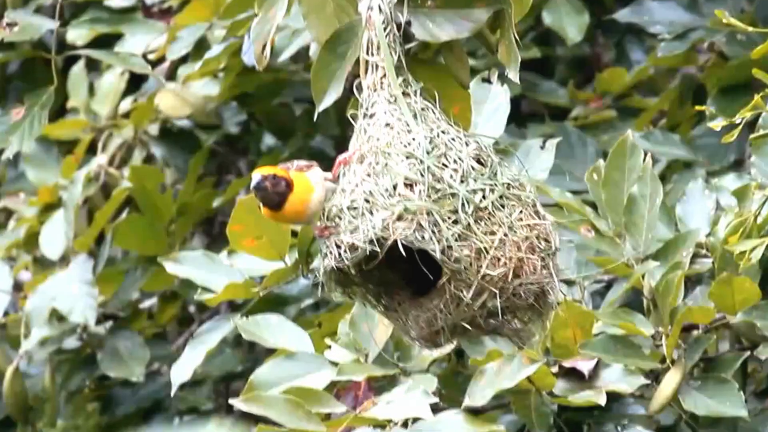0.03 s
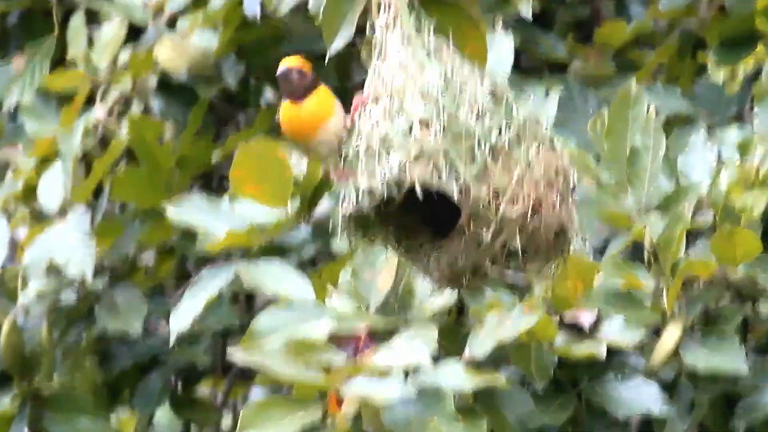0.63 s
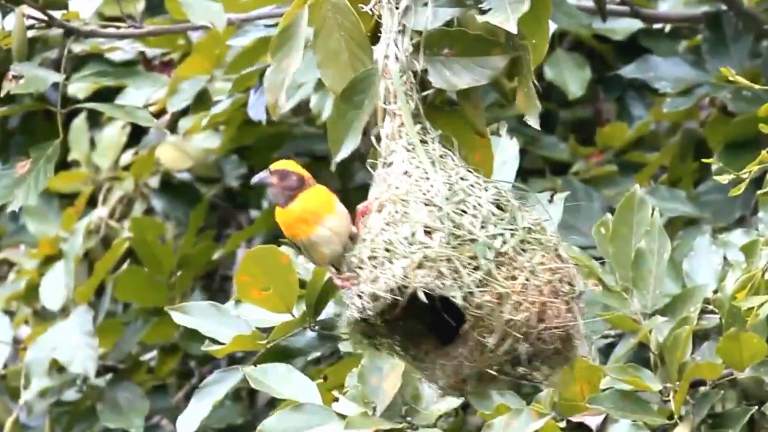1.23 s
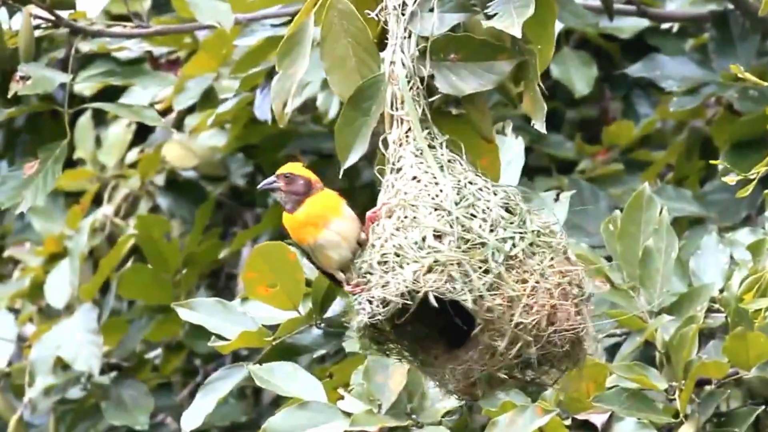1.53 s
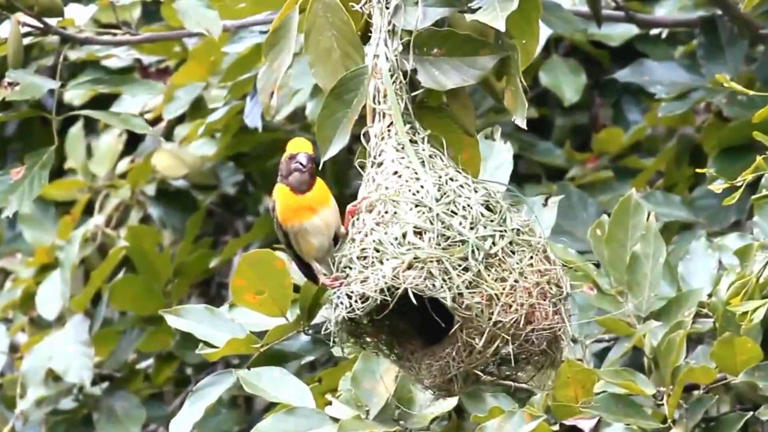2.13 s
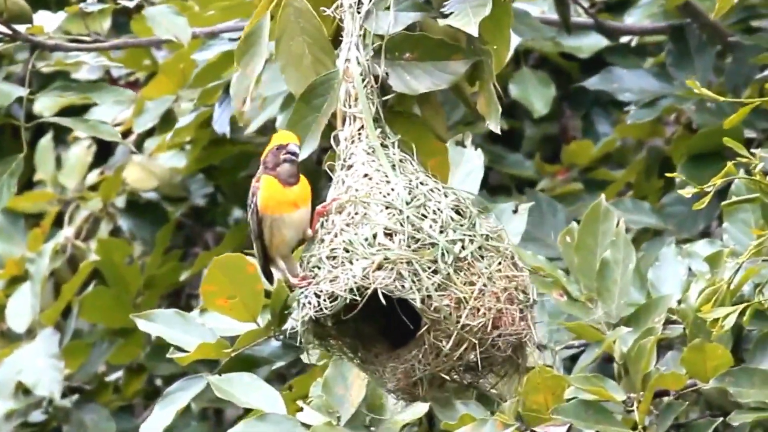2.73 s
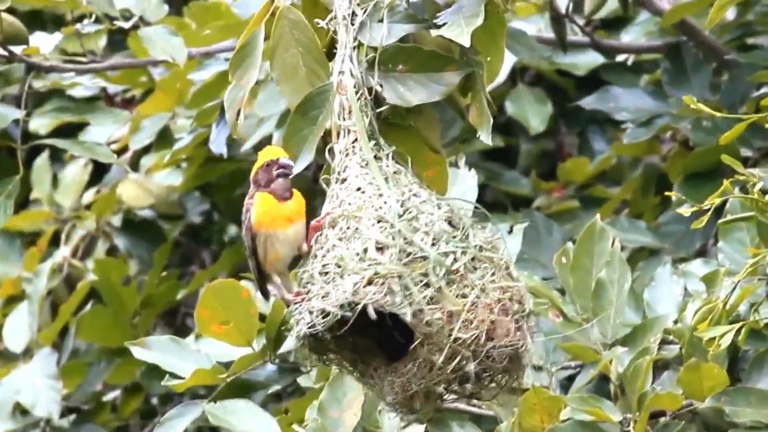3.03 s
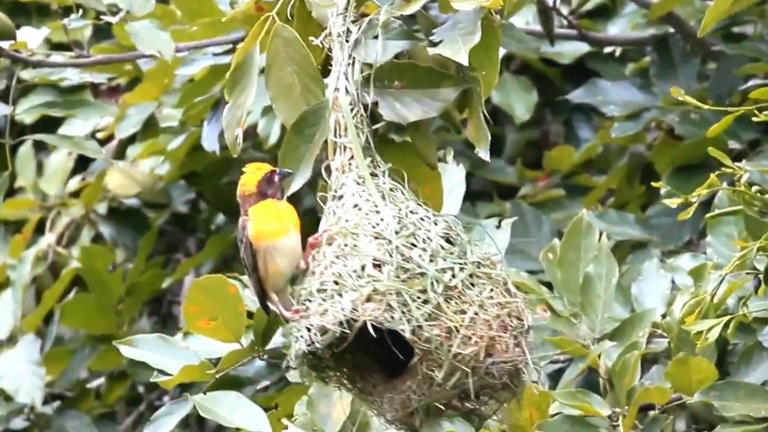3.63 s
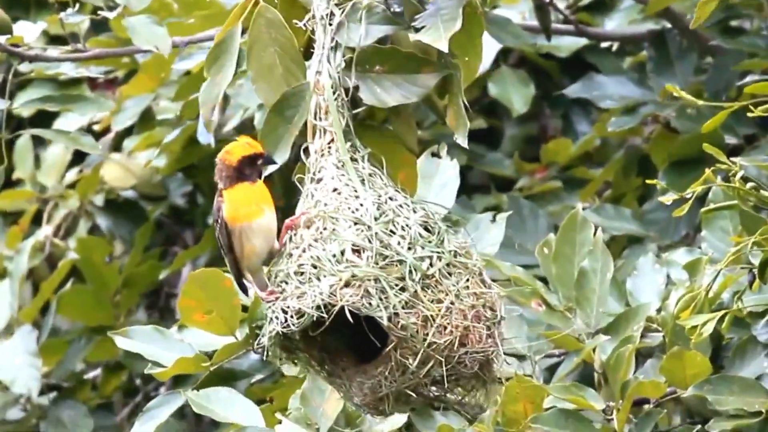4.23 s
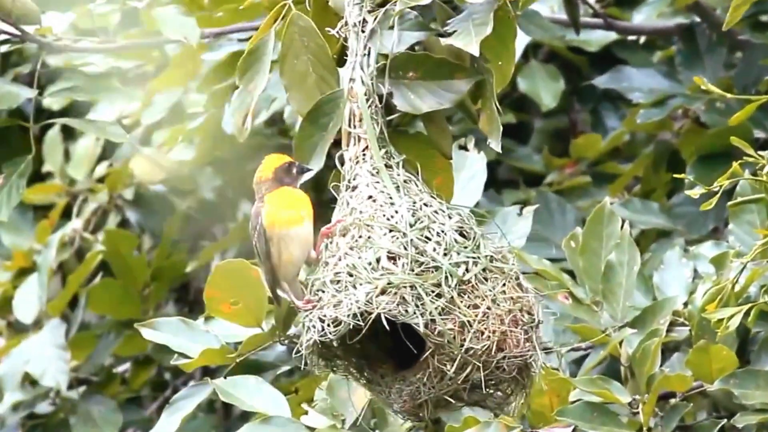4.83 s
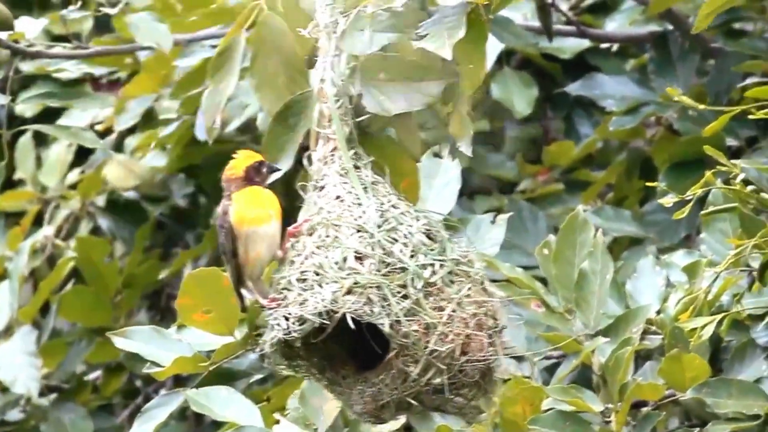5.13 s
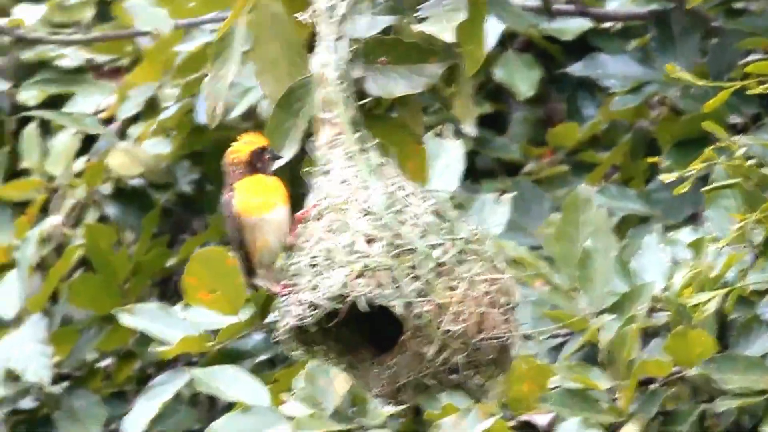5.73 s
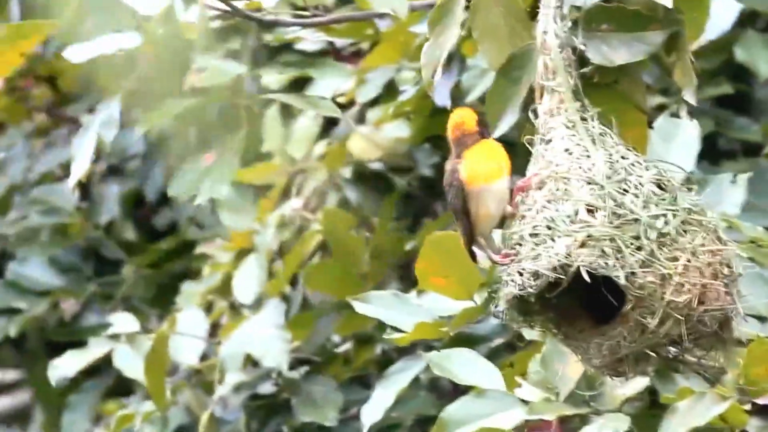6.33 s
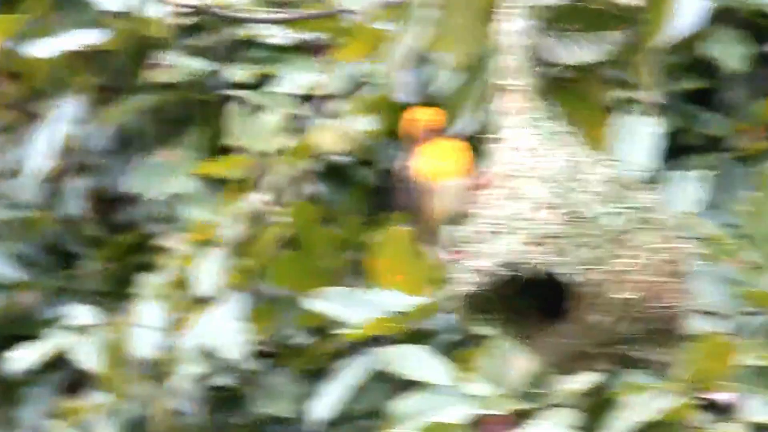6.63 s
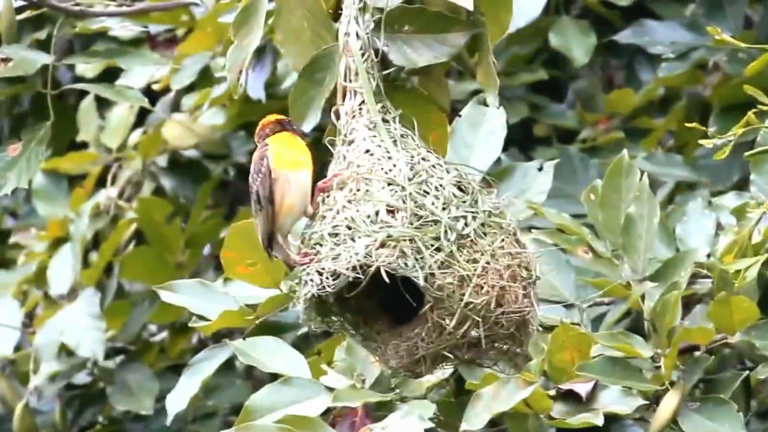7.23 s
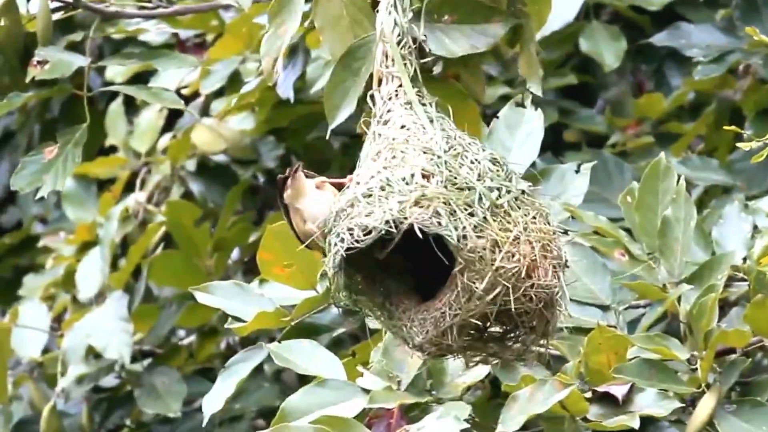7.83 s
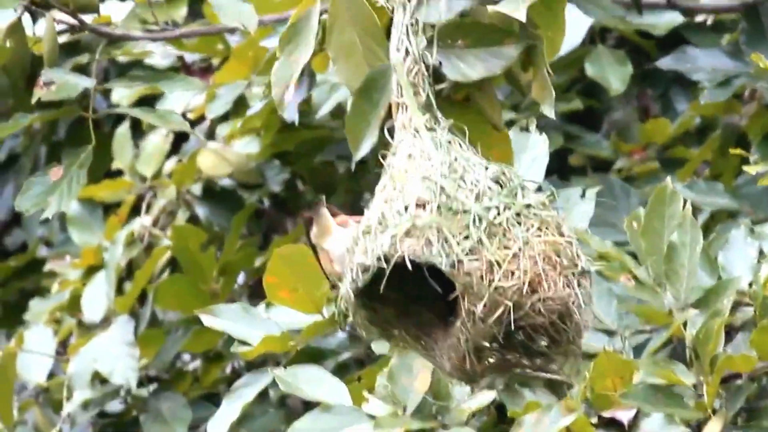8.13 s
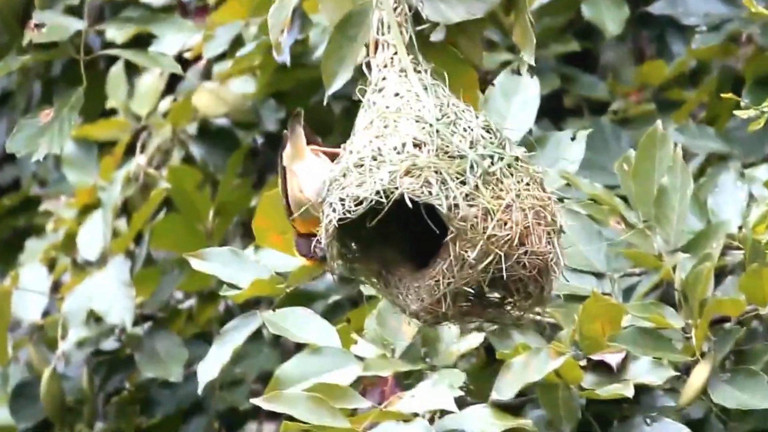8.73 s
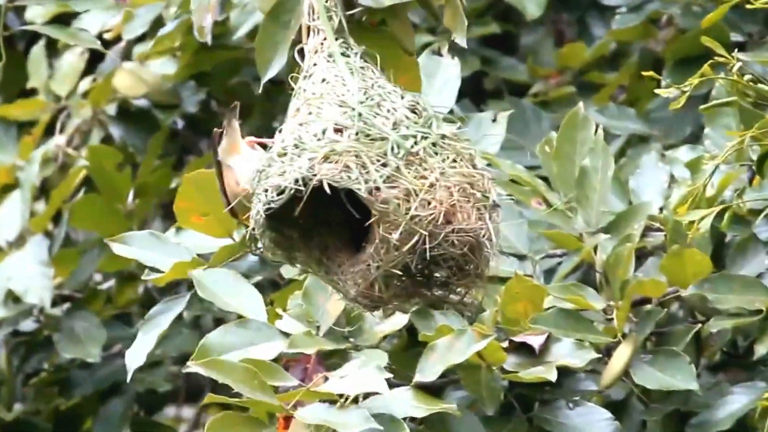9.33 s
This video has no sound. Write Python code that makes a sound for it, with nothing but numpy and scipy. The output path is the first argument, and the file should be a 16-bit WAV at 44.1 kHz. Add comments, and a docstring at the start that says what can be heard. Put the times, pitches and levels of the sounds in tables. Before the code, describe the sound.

A steady high insect band, faint leaf rustle and a low distant hum run throughout, outdoors among trees. A close songbird gives one bright phrase at the start. Another bird repeats a two-note whistle about three times a second until 6.5 seconds, returning at 8. During the first two seconds soft low coos sound far off while a weaver bird chatters in short scratchy bursts. The weaver whistles at 2 seconds, then gives a wheezy buzz from 2.6 to 3.5. The close songbird, the loudest voice, sings five quick high phrases from 3.5 to 5, and crickets grow clearer. At 5 seconds a crow caws once in the distance, and a far songbird repeats falling phrases until 8.5. Brief chatter and five more close phrases come between 7.4 and 8.8. The foliage scatters the calls into short echoes.

```python
"""A leafy tree, with faint rustle, a distant hum, crickets and a steady insect band throughout.
First a two-note bird starts up and low calls sound far off, while a weaver at its nest chatters.
The weaver whistles, then gives a long wheezy buzz, both sides of its syrinx pulsing into one throat.
A near songbird follows in almost pure tones; at five seconds a crow caws and a far songbird joins.
Late on, the chatter and the near song return. The foliage scatters the calls into short echoes."""
import sys
import numpy as np
from scipy import signal
from scipy.fft import rfft, irfft
from scipy.io import wavfile
from scipy.ndimage import uniform_filter1d, map_coordinates

SR = 44100
rng = np.random.default_rng(int(sys.argv[2]) if len(sys.argv) > 2 else 0)


def output_pcm(signal):
    """Save a mono or channel-first signal as 16-bit PCM at the path in sys.argv[1].

    Samples are clipped to [-1, 1] before scaling.
    """
    pcm = np.clip(np.atleast_2d(signal).T, -1, 1) * 32767
    wavfile.write(sys.argv[1], SR, np.round(pcm).astype(np.int16))


N = 413658
T = np.arange(N) / SR


def amp(db):
    """Amplitude ratio: a factor of ten for every 20 dB."""
    return 10 ** (np.asarray(db) / 20)


def unit(x):
    """Normalisation to an rms of 1."""
    return x / np.sqrt(np.mean(x ** 2) + 1e-20)


def response(spectrum, hz):
    """Frequency response: the gain at hz, interpolated in dB over log frequency."""
    f, db = np.transpose(spectrum)
    return amp(np.interp(np.log(hz + 1), np.log(f), db))


def noise(spectrum, n):
    """Spectral shaping: white noise is filtered, then normalised."""
    gain = response(spectrum, np.fft.rfftfreq(n, 1 / SR))
    return unit(irfft(rfft(rng.standard_normal(n)) * gain, n))


def drift(n, hz):
    """Random modulation: a smooth curve of rms near 1, with rates up to about hz."""
    knots = rng.standard_normal(2048)
    return map_coordinates(knots, [np.arange(n) * 2 * hz / SR], order=2, mode="wrap")


def phase(hz):
    """Phase as the time integral of frequency."""
    return 2 * np.pi * np.cumsum(hz) / SR


def trace(rows):
    """Linear interpolation of breakpoints: sample times, then a curve for each further column."""
    s, *columns = np.transpose(rows)
    t = np.arange(s.min(), s.max(), 1 / SR)
    return [t] + [np.interp(t, np.sort(s), c) for c in columns]


def add(mix, s, sound):
    """Superposition: the sound joins the mix at s seconds."""
    part = mix[max(round(s * SR), 0):][:len(sound)]
    part += sound[:len(part)]


def syrinx(hz, db, second_db, third_db, waver=0.0048, flutter_db=2.0):
    """Self-sustained oscillation: a tone and two overtones, unsteady in pitch and level."""
    n = len(hz)
    turn = phase(uniform_filter1d(hz, size=50) * (1 + waver * drift(n, 130.1)))
    tone = np.sin(turn) + amp(second_db) * np.sin(2 * turn)
    tone += amp(third_db) * np.sin(3 * turn) * (hz < SR / 6)  # only where it cannot alias
    gain = amp(db + flutter_db * drift(n, 90.1))
    return np.sqrt(2) * tone * gain * signal.windows.tukey(n, min(1, 130 / n))


def note(s, contour, db, overtones_db=-42, pitch=1):
    """Frequency and amplitude modulation along a contour, as (start, sound)."""
    t, hz, level_db = trace(contour)
    return s + t[0], syrinx(hz * pitch, db + level_db, overtones_db, overtones_db)


def bowed_line(u, first_hz, last_hz, bow_hz):
    """A linear sweep over u from 0 to 1, bent by a parabola of height bow_hz."""
    return first_hz + (last_hz - first_hz) * u + bow_hz * (1 - (2 * u - 1) ** 2)


def glide(s, length, first_hz, last_hz, bow_hz, db, swell_db, overtones_db=-42):
    """A frequency sweep whose level changes by swell_db, as (start, sound)."""
    u = np.linspace(0, 1, round(length * SR))
    hz = bowed_line(u, first_hz, last_hz, bow_hz)
    tone = syrinx(hz, db + swell_db * (u - .5), overtones_db, overtones_db)
    return s, tone * signal.windows.tukey(len(u), .46)


def add_phrase(mix, start_s, syllables, db):
    """Superposition of glides with a common time origin and gain."""
    for row in syllables:
        s, sound = glide(*row)
        add(mix, start_s + s, amp(db) * sound)


def harmonics(hz, throat, stop):
    """Source and filter: harmonics from the third up, in random phase, weighted by the throat."""
    turn = phase(hz)
    partials = (throat(k * hz) * np.cos(k * turn + rng.uniform(0, 2 * np.pi)) for k in range(3, stop))
    return unit(sum(partials))


def foliage(x, t60, delay_s=0.0045, echoes_per_s=3000):
    """Scattering by leaves and branches: random echoes that decay 60 dB in t60 seconds."""
    t = np.arange(SR // 2) / SR
    taps = rng.standard_normal(len(t)) * (rng.random(len(t)) < echoes_per_s / SR)
    taps *= (t > delay_s) * amp(-60 * t / t60)
    return signal.oaconvolve(x, taps / np.linalg.norm(taps))[:N]


# The spectrum of outdoor air. Each row: frequency in Hz, relative level in dB.
AIR_SPECTRUM = [(20, -10), (45, -2), (90, -1.5), (140, -2), (200, -6.5), (450, -9), (750, -9),
                (1000, -13.5), (1400, -11.5), (2000, -17), (3000, -15.5), (5000, -15.5), (7500, -28.5),
                (10000, -33.5), (15500, -35)]

def air(db=-51):
    """Broadband ambient noise, strongest in the bass and slightly unsteady."""
    return noise(AIR_SPECTRUM, N) * amp(db + .5 * drift(N, 5.5))


# The course of the distant hum. Each row: time in seconds, pitch in Hz, level in dB.
HUM_CONTOUR = [(0, 72.73, -55.5), (1.5, 71.8, -58.5), (2.6, 71.9, -54), (3.3, 69.96, -53),
               (3.8, 70.15, -49.5), (4.4, 71.1, -47.5), (4.8, 71.8, -50.5), (5.1, 75.13, -52),
               (6.2, 75.5, -54.5), (7.2, 74.8, -58.5), (7.8, 72.8, -55.5), (9.38, 72.35, -57)]

def hum():
    """A low fundamental and its octave waver under random modulation."""
    s, hz, db = np.transpose(HUM_CONTOUR)
    turn = phase(np.interp(T, s, hz) * (1 + 0.0346 * drift(N, 9)))
    gain = amp(np.interp(T, s, db) + 2.3 * drift(N, 7))
    return np.sqrt(2) * gain * (np.sin(turn) + amp(-16) * np.sin(2 * turn))


# Far rumbles. Each row: start and length in seconds, centre and width in Hz, level in dB.
RUMBLE_SWELLS = [(4.3, 3.1, 134, 24, -60), (7.1, 1.33, 145.8, 19.5, -56), (8.1, 1.57, 144, 17, -57),
                 (8.15, 0.75, 350, 47, -56)]

def rumbles():
    """Narrow bands of low noise swell and fade."""
    out = np.zeros(N)
    for s, length, hz, width, db in RUMBLE_SWELLS:
        n = round(length * SR)
        band = [(20, -50), (hz - 2 * width, -16), (hz, 0), (hz + 2 * width, -16), (hz * 4, -70)]
        add(out, s, amp(db) * noise(band, n) * signal.windows.tukey(n, .7))
    return out


def leaf_rustle(db=-67, ticks_per_s=14):
    """Shot noise: each random tick of a leaf or dry grass is a quickly damped burst."""
    ticks = (rng.random(N) < ticks_per_s / SR) * rng.exponential(1, N)
    leaf = noise([(500, -4), (2000, 5.5), (6000, -9.5), (15000, -22)], 600)
    leaf *= np.exp(-np.arange(600) / 120)
    return amp(db) * unit(signal.oaconvolve(ticks, leaf)[:N])


# The spectrum of the insect chorus. Each row: frequency in Hz, relative level in dB.
INSECT_SPECTRUM = [(4000, -32), (5350, -24), (5650, -5), (5820, -6), (5890, 2.5), (5950, -10), (6100, -3.5),
                   (6300, -15.5), (6650, -8), (6850, -13), (7000, -12.5), (7150, -26), (7700, -31)]

def insect_band(db=-48, throb_hz=70, throb_db=1.5):
    """Incoherent summation: many insects merge into a throbbing band of noise."""
    band = noise(INSECT_SPECTRUM, N)
    return amp(db) * unit(band * amp(throb_db * drift(N, throb_hz) + 0.81 * drift(N, 3.2)))


def insect_drone(hz=5900, db=-54, waver=0.00512, throb_hz=60, throb_db=3):
    """Random modulation broadens one tone into the ringing core of the insect band."""
    tone = np.sin(phase(hz * (1 + waver * drift(N, 110))))
    return amp(db) * unit(tone * amp(throb_db * drift(N, throb_hz)))


# The cricket's changing strength. Each row: time in seconds, level in dB.
CRICKET_LEVELS = [(0, -59), (3.4, -71), (4, -49.5), (5.6, -45), (6.1, -53), (6.9, -48), (8.6, -50.5),
                  (9.38, -51)]

def cricket(chirp_gap_s=.16, pulse_gap_s=.021):
    """Stridulation: each chirp is four tone pulses that sag in pitch."""
    out = np.zeros(N)
    pulse = [(0, 6700, -10), (.005, 6610, 1), (.015, 6530, 1), (.022, 6440, -10)]  # s, Hz, dB
    for s in np.arange(.08, T[-1], chirp_gap_s):
        db = np.interp(s, *np.transpose(CRICKET_LEVELS))
        for k, (late, loud, sharp) in enumerate(rng.standard_normal((4, 3))):
            start_s = s + k * pulse_gap_s + .002 * late
            add(out, *note(start_s, pulse, db + 1.5 * loud, overtones_db=-25, pitch=1 + .006 * sharp))
    return out


# Far low calls. Each row: start and length in seconds, first pitch, last pitch and bow in Hz,
# source level in dB.
LOW_CALLS = [(.02, .47, 745, 645, 0, -53), (.6, .38, 675, 570, 10, -59), (1.52, .44, 640, 610, 62, -53)]

def low_calls(direct=0.58, scattered=0.48):
    """Multipath propagation: soft coos arrive partly direct, partly scattered by the trees."""
    out = np.zeros(N)
    for s, length, first_hz, last_hz, bow_hz, db in LOW_CALLS:
        u = np.linspace(0, 1, round(length * SR))
        coo = syrinx(bowed_line(u, first_hz, last_hz, bow_hz), db, -18, -25, waver=.04)
        add(out, s, coo * signal.windows.tukey(len(u), .4))
    return direct * out + scattered * foliage(out, t60=0.3)


# Tiny high trills. Each row: start in seconds, level in dB.
HIGH_TRILLS = [(4.35, -64), (4.95, -62), (5.5, -65), (6.0, -61), (6.74, -59)]

def high_trills(centre_hz=7750, depth_hz=200, rate_hz=95):
    """Sinusoidal frequency modulation turns a brief tone into a trill."""
    out, t = np.zeros(N), np.arange(0, .08, 1 / SR)
    hz = centre_hz + depth_hz * np.sin(2 * np.pi * rate_hz * t)
    for s, db in HIGH_TRILLS:
        add(out, s, syrinx(hz, db, -55, -60))
    return out


# The far songbird's phrases. Each row: time in seconds, level in dB.
FAR_PHRASES = [(5.023, -45), (5.353, -42), (5.684, -40.5), (6.011, -43), (6.34, -44), (6.671, -41),
               (7.013, -42.5), (7.349, -44), (7.695, -42), (8.04, -43), (8.388, -40.5)]
# Its syllables: thin lead, high slip, sweep, hold, fall. Each row: offset and length in seconds,
# first pitch, last pitch and bow in Hz, relative level and swell in dB.
FAR_SYLLABLES = [(-.1, 0.043, 4730, 4450, 30, -4, 11), (-.055, .034, 6510, 6200, 28, -5, 7),
                 (-.015, .031, 6520, 3760, -48, 1, 5), (0.014, .04, 4030, 3880, 37, 1, 17),
                 (0.058, .035, 4520, 3150, 0, 0.5, -1)]

def far_songbird():
    """Five downward frequency sweeps form a phrase, repeated three times a second."""
    out = np.zeros(N)
    for s, db in FAR_PHRASES:
        add_phrase(out, s, FAR_SYLLABLES, db)
    return out


# The crow's caw. Each row: time in seconds, pitch in Hz, level in dB, throat resonance in Hz.
CAW_CONTOUR = [(4.97, 198, -62, 1340), (5.03, 214, -47, 1570), (5.075, 230, -41.5, 1780),
               (5.15, 211.2, -40.5, 1710), (5.2, 195.4, -46, 1640), (5.3, 192, -47, 1690),
               (5.35, 179, -49, 1710), (5.39, 170.8, -68, 1603)]

def crow(width_hz=270, low_hz=1230, low_db=-9):
    """Formant filtering: hoarse, uneven pulses pass a resonance that follows the beak and a low one."""
    t, hz, db, formant_hz = trace(CAW_CONTOUR)

    def throat(f):
        moving = 1 / (1 + ((f - formant_hz) / width_hz) ** 4)
        return moving + amp(low_db) / (1 + ((f - low_hz) / 170) ** 2)

    voice = harmonics(hz * (1 + .045 * drift(len(t), 140)), throat, stop=16)
    return t[0], amp(db) * unit(voice * amp(2.3 * drift(len(t), 79.5)))


# The two-note bird's runs. Each row: time of the first arch in seconds, phrase count, level in dB.
TWO_NOTE_RUNS = [(.208, 4, -38.5), (1.644, 2, -38), (2.341, 11, -38.5), (6.269, 1, -39.5), (8.144, 4, -42)]
# Its second note, a shelf and a climb. Each row: offset in seconds, pitch in Hz, relative level in dB.
RISE_CONTOUR = [(-.072, 2810, -15), (-.061, 3321, -2.5), (-.051, 3389, 3.5), (-.03, 3259, -3.5),
                (-.01, 3316, 6.5), (0, 3542, 1), (.018, 4177, 5), (.028, 4360, -1), (.036, 4210, -24)]

def two_note_bird(period_s=.3555, rise_after_s=.129, foot_hz=1885, top_hz=2667.5):
    """Coupled pitch and level: an arch, loudest at its top, precedes a rising whistle."""
    out, up_s, down_s = np.zeros(N), .034, .024
    t = np.arange(-1.55 * up_s, 1.74 * down_s, 1 / SR)
    height = np.exp(-(t / np.where(t < 0, up_s, down_s)) ** 2)
    hz = foot_hz + (top_hz - foot_hz) * height
    arch_db = -17 + 21 * height
    for first_s, phrases, db in TWO_NOTE_RUNS:
        for s in first_s + period_s * np.arange(round(phrases)):
            arch_pitch, rise_pitch = 1 + 0.00505 * rng.standard_normal(2)
            arch = syrinx(hz * arch_pitch, db + arch_db, -42, -42, waver=0.0091, flutter_db=3)
            add(out, s + t[0], arch)
            add(out, *note(s + rise_after_s, RISE_CONTOUR, db, pitch=rise_pitch))
    return out


# The near songbird's phrases. Each row: time in seconds, opening level in dB, delay of the top note
# in seconds, its level in dB, its pitch in Hz.
NEAR_PHRASES = [(.083, -27, 0.11, -24.5, 6500), (3.564, -32.5, .103, -25.5, 6490),
                (3.854, -27.5, 0.1, -23, 6480), (4.152, -27, 0.1, -21, 6490),
                (4.454, -28, 0.1, -19.5, 6570), (4.749, -26, 0.1071, -19.5, 6540),
                (7.393, -26, 0.11, -22, 6400), (7.693, -25, 0.1052, -21.5, 6550),
                (7.985, -23, .11, -22.5, 6500), (8.286, -25.5, 0.11, -24, 6560),
                (8.59, -26, 0.11, -23.5, 6590)]
# Its opening: lead, sweep, hold, two flicks. Each row: offset and length in seconds, first pitch,
# last pitch and bow in Hz, relative level and swell in dB.
OPENING_SYLLABLES = [(-.04, .038, 4600, 4290, 50, -11, 18), (-.001, .024, 4950, 3550, 20, .5, 4),
                     (.02, .04, 3830, 3620, 80, -1.5, 9), (.058, .009, 4200, 3600, -150, -3.5, 2),
                     (.067, .008, 4600, 3950, 0, -6, 0)]
# Its downward step. Each row: time from the top note in seconds, pitch in Hz, relative level in dB.
STEP_CONTOUR = [(-.032, 5720, -20), (-.025, 5770, -8), (-.019, 5700, -2), (-.013, 5570, 1),
                (-.007, 5260, 2), (-.003, 4950, -14)]

def near_songbird(top_s=0.03, scoop_hz=754, scoop_s=0.0021, climb_hz=168):
    """Frequency sweeps lead to a bright top note, which drops onto its pitch and then creeps up."""
    out, t = np.zeros(N), np.arange(0, top_s, 1 / SR)
    bend_hz = scoop_hz * np.exp(-t / scoop_s) + climb_hz * (t / top_s - .5)
    for s, opening_db, leap_s, top_db, top_hz in NEAR_PHRASES:
        add_phrase(out, s, OPENING_SYLLABLES, opening_db)
        add(out, *note(s + leap_s, STEP_CONTOUR, top_db - 2.5))
        top = syrinx(top_hz + bend_hz, top_db, -43, -43, waver=0.011, flutter_db=2.4)
        add(out, s + leap_s, top * signal.windows.tukey(len(t), .31))
    return out


# Slurs in the tree. Each row: start and length in seconds, first pitch, last pitch and bow in Hz,
# level, swell and relative overtone level in dB.
SLURS = [(1.373, 0.129, 5980, 4370, 170, -38.5, 5, -41), (1.915, 0.048, 4780, 4550, 20, -49, 7, -40),
         (1.998, 0.043, 4790, 4700, 1, -33.5, -2, -22), (1.999, .055, 4300, 3900, -64, -38.5, 2, -21),
         (2.32, 0.021, 7100, 4280, 0, -45, 9, -35), (2.572, 0.047, 4770, 4530, 40, -47, 2, -40),
         (2.59, 0.015, 2500, 2030, -300, -37.5, 0, -25)]
# The weaver's hooked notes. Each row: start in seconds, opening pitch in Hz, level in dB.
HOOKED_NOTES = [(1.943, 4270, -29.5), (2.531, 4400, -31.5), (3.413, 3850, -40)]
# Soft low peeps. Each row: start in seconds, level in dB.
LOW_PEEPS = [(.36, -47), (3.449, -46)]
# Twitters. Each row: time in seconds, level in dB.
TWITTER_TIMES = [(5.633, -48), (5.879, -43)]
# A twitter's zigzag. Each row: offset in seconds, pitch in Hz, relative level in dB.
TWITTER_CONTOUR = [(-.07, 5250, -5), (-.052, 5150, 2.5), (-.034, 3650, -5), (-.016, 3200, 4), (0, 4750, -4),
                   (.012, 3300, 8), (.026, 4450, -5), (.038, 3500, 9), (.055, 3150, -14)]

def short_calls(hook_s=0.041, hook_end_hz=3310, turn_s=.021, fall_s=0.0057, peep_hz=1069):
    """Frequency modulation shapes the syrinx tone into slurs, hooks, peeps and twitters."""
    out, t = np.zeros(N), np.arange(0, hook_s, 1 / SR)
    for row in SLURS:
        add(out, *glide(*row))
    fall = (1 - np.tanh((t - turn_s) / fall_s)) / 2
    swell_db = 15 * (t / hook_s - .5)
    for s, first_hz, db in HOOKED_NOTES:
        hook = syrinx(hook_end_hz + (first_hz - hook_end_hz) * fall, db + swell_db, -30, -30)
        add(out, s, hook * signal.windows.tukey(len(t), .45))
    for s, db in LOW_PEEPS:
        add(out, *glide(s, 0.049, peep_hz, peep_hz, bow_hz=46, db=db, swell_db=0, overtones_db=1))
    for s, db in TWITTER_TIMES:
        add(out, *note(s, TWITTER_CONTOUR, db, overtones_db=-27))
    return out


# The weaver's chatter. Each row: start and stroke spacing in seconds, level and opening accent in dB,
# pitch factor, relative rasp level in dB.
CHATTER_BURSTS = [(.4, .011, -44.5, 4, 0.89, -1), (.552, .0105, -40.5, 6.5, 0.99, -5),
                  (.695, .0105, -42, 7, 1.02, -6), (.995, .02, -44.5, 1, 0.79, -9),
                  (1.146, 0.014, -45.5, 6, 0.94, -10), (1.308, .017, -44, 4, 0.92, -15),
                  (1.452, .015, -42, 2, 0.9, -13.5), (1.617, .014, -44, 6, 0.96, -16),
                  (1.765, 0.013, -40.5, 0, 1.02, -11), (6.74, 0.012, -52, -1, .9, -2),
                  (7.567, .011, -43.5, 1.5, .85, -11), (7.738, .01, -43.5, 6.5, 1, -5.5)]
# The scratch in each stroke. Each row: frequency in Hz, relative level in dB.
RASP_SPECTRUM = [(900, -17), (2200, -6), (3200, 0.5), (5000, 1.5), (6500, -19), (8000, -16.5), (12000, -15),
                 (15500, -25)]

def weaver_chatter(burst_s=.082, accent_s=0.016, stroke_s=0.029, lower_ratio=.66, beak_hz=2200):
    """Two-voice phonation: the lower side of the syrinx joins every second scratchy, falling stroke."""
    out, t = np.zeros(N), np.arange(0, stroke_s, 1 / SR)
    fall_hz = 5400 * np.exp(-t / .038)
    window = signal.windows.tukey(len(t), .3)
    for s, gap, db, accent_db, pitch, rasp_db in CHATTER_BURSTS:
        for k, age in enumerate(np.arange(0, burst_s, gap)):
            sharp, late, loud = rng.standard_normal(3) * (k > 0)
            hz = fall_hz * pitch * (1 + .07 * sharp) * (1 - 0.805 * age)  # the burst droops in pitch
            level_db = db + accent_db * np.exp(-age / accent_s) - 3.5 * t / stroke_s + 2 * loud
            upper = syrinx(hz, level_db, -22, -30, waver=.03, flutter_db=3)
            lower = syrinx(hz * lower_ratio, level_db - 3, -20, -24, waver=.025, flutter_db=3)
            upper /= 1 + (beak_hz / hz) ** 8  # the small beak radiates low pitches poorly
            lower /= 1 + (beak_hz / (hz * lower_ratio)) ** 8
            rasp = amp(level_db + rasp_db) * noise(RASP_SPECTRUM, len(t))
            add(out, s - .002 + age + .25 * late * gap, window * (upper + rasp + lower * (k % 2)))
    return out


# The weaver's whistle. Each row: time in seconds, pitch in Hz, level in dB.
WHISTLE_CONTOUR = [(2.04, 3890, -38), (2.064, 3820, -25.5), (2.092, 3794, -23), (2.16, 3851, -36),
                   (2.268, 4150, -27.5), (2.348, 4143, -27), (2.378, 3820, -23.5), (2.398, 3805, -20),
                   (2.41, 3850, -28.5), (2.434, 3978, -23.5), (2.45, 3926, -35)]

def weaver_whistle(warble_hz=122, calm_hz=3840, warble_share=0.32, throb_db=2.4):
    """Modulation of pitch and level deepens as the whistle is pushed above its calm pitch."""
    t, hz, db = trace(WHISTLE_CONTOUR)
    push_hz = np.maximum(hz - calm_hz, 0)
    warble = push_hz * np.sin(phase(warble_hz * (1 + .06 * drift(len(t), 40))))
    level_db = db + throb_db * warble / (push_hz.max() + 1)
    return t[0], syrinx(hz + warble_share * warble, level_db, -33.5, -29, waver=0.005, flutter_db=1.3)


# The pulsing of the buzz. Each row: time in seconds, pulse rate of the first voice in Hz.
BUZZ_PULSE_RATE = [(2.6, 240.4), (2.87, 226.6), (3.08, 236.1), (3.32, 231.2), (3.44, 217)]
# The response of the weaver's throat. Each row: frequency in Hz, relative gain in dB.
THROAT_RESPONSE = [(900, -48), (1800, -19.5), (2400, -18.5), (2900, -9), (3400, -9.5), (3950, 2.5),
                   (4350, -2.5), (4750, -4.5), (5700, -3), (6200, -14.5), (7200, -27), (10000, -33.5),
                   (12100, -17.5), (13400, -31), (15500, -38)]

def weaver_buzz(start_s=2.595, length_s=0.862, attack_s=0.028, release_s=0.087, db=-33.5):
    """Biphonation: both sides of the syrinx drive one throat; the shakier smears the upper partials."""
    t = np.arange(0, length_s, 1 / SR)
    n, hz = len(t), np.interp(start_s + t, *np.transpose(BUZZ_PULSE_RATE))
    envelope = np.minimum(t / attack_s, 1) * np.minimum((length_s - t) / release_s, 1)
    first_hz = hz * (1 + .009 * drift(n, 120) + .004 * drift(n, 12))
    second_hz = hz * 0.93 * (1 + .016 * drift(n, 120) + .016 * drift(n, 12))
    first = harmonics(first_hz, lambda f: response(THROAT_RESPONSE, f), stop=66)
    high_passed = lambda f: response(THROAT_RESPONSE, f) / (1 + (3500 / f) ** 12)
    second = harmonics(second_hz, high_passed, stop=66)
    hiss = noise(THROAT_RESPONSE, n)
    voice = unit(first + amp(-3) * second + amp(-9) * hiss)
    return start_s, envelope * amp(db - 0.3 * drift(n, 58)) * voice


def scene():
    """Direct and scattered sound add: the farther the bird, the more arrives by way of the trees."""
    weaver = weaver_chatter() + short_calls()
    far = far_songbird() + high_trills() + low_calls()
    add(weaver, *weaver_buzz())
    add(far, *crow())
    near, two_note = near_songbird(), two_note_bird()
    add(near, *weaver_whistle())
    out = weaver + amp(-6.5) * foliage(weaver, t60=0.18)
    out += near + amp(-11) * foliage(near, t60=0.25)
    out += two_note + amp(-5) * foliage(two_note, t60=0.12)
    out += amp(-13.5) * foliage(two_note, t60=0.36, delay_s=0.041)
    out += far + amp(-6.5) * foliage(far, t60=0.3)
    out += insect_band() + cricket() + insect_drone()
    return (out + air() + hum() + leaf_rustle() + rumbles())[None]


def record(dry):
    """Gating and band limiting: the sound opens after a moment and passes a steep low-pass filter."""
    start_s, cutoff_hz = .081, 15550
    opened = dry * np.clip((T - start_s) * 500, 0, 1)
    low_pass = signal.firwin(511, cutoff_hz, window=("kaiser", 9), fs=SR)
    return signal.oaconvolve(opened, low_pass[None], "same")


dry = scene()
out = record(dry)
output_pcm(out)
```